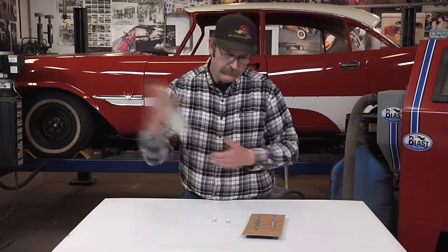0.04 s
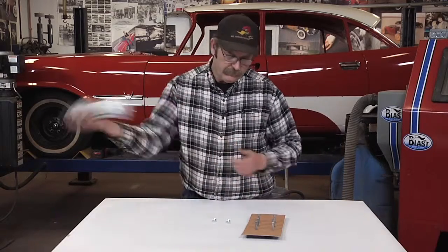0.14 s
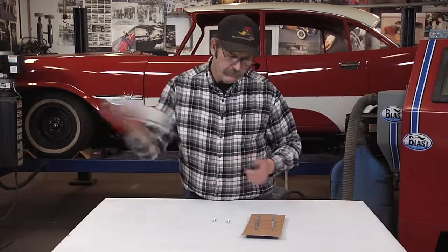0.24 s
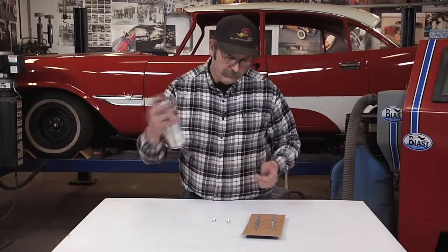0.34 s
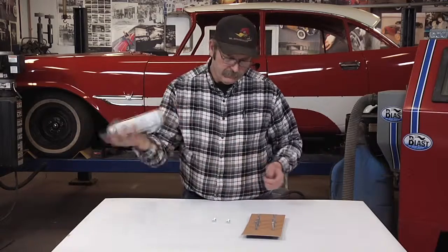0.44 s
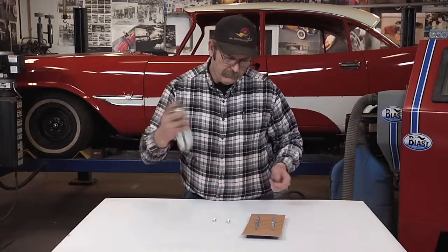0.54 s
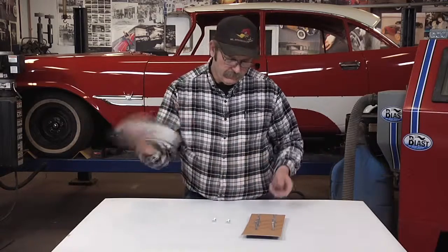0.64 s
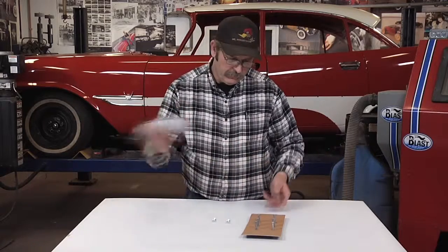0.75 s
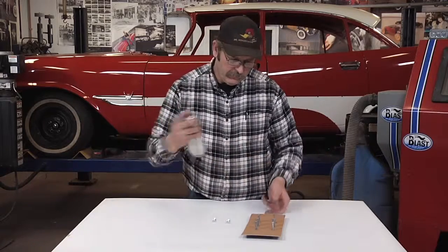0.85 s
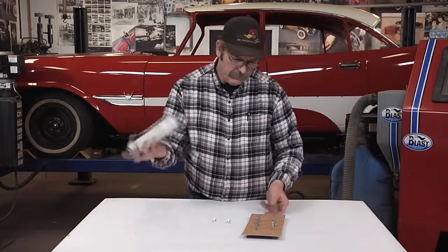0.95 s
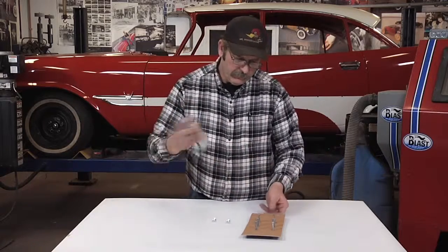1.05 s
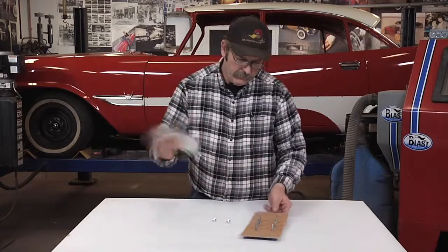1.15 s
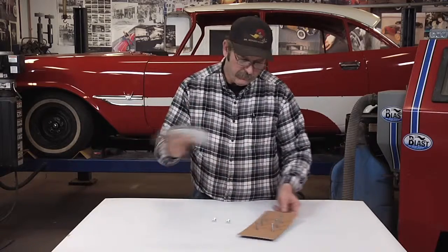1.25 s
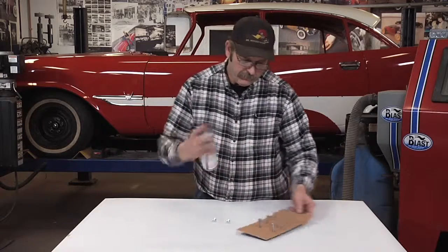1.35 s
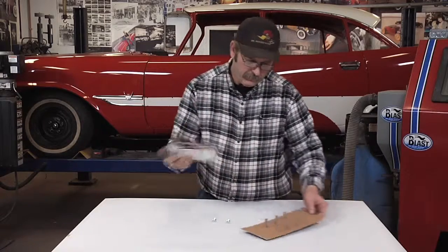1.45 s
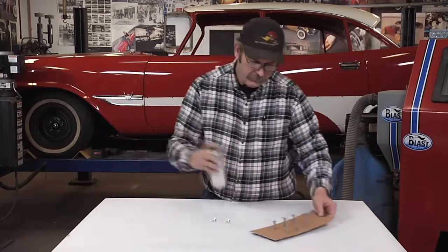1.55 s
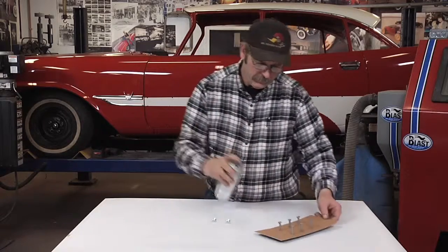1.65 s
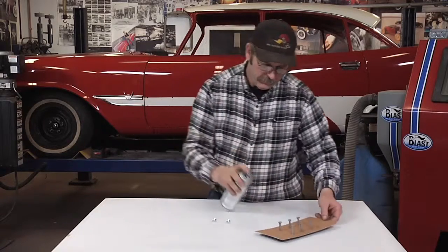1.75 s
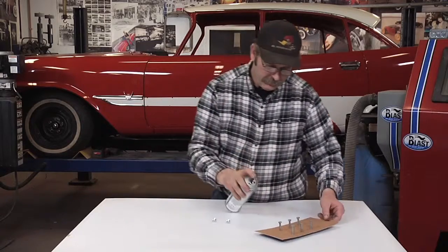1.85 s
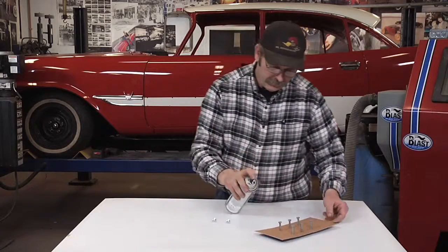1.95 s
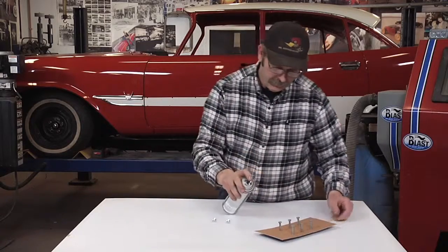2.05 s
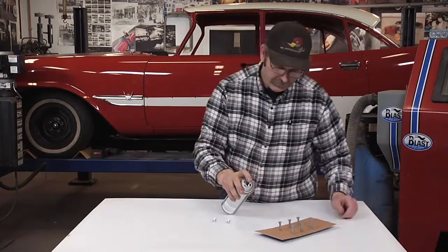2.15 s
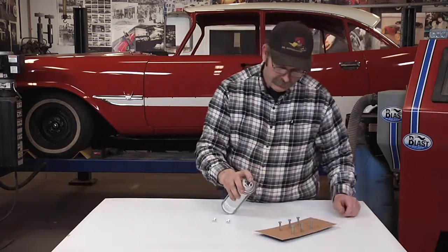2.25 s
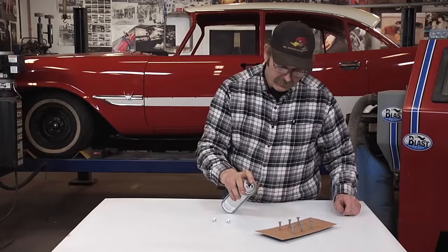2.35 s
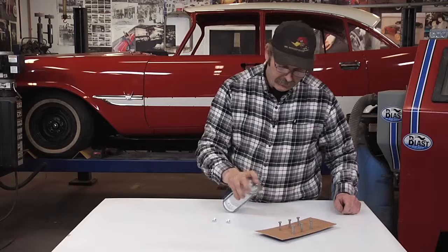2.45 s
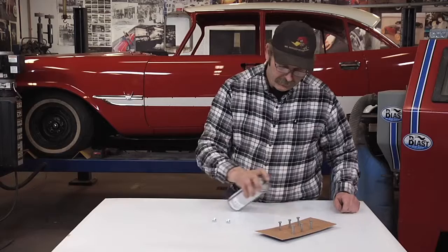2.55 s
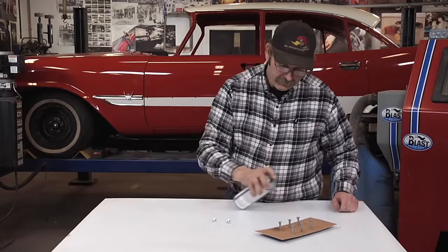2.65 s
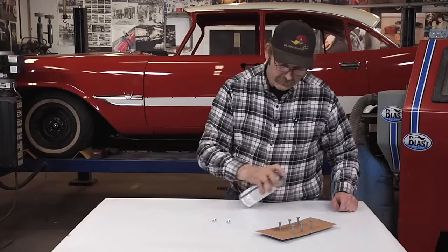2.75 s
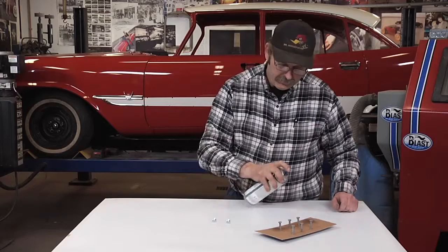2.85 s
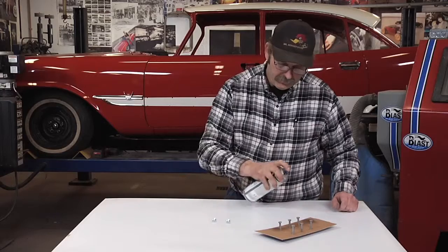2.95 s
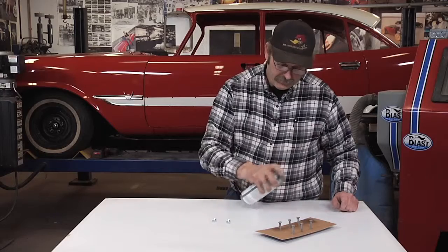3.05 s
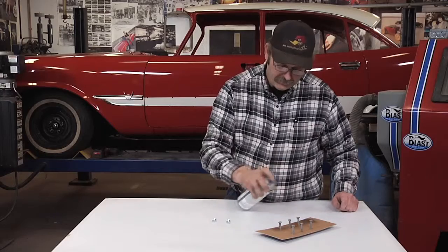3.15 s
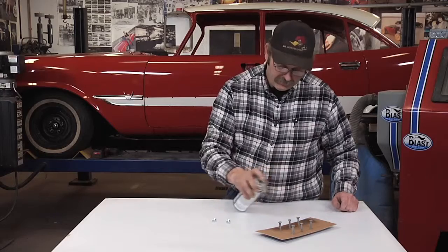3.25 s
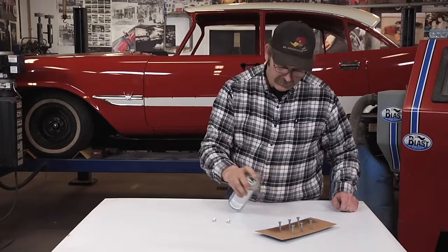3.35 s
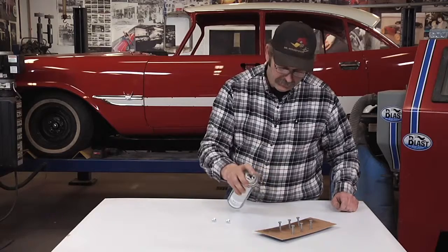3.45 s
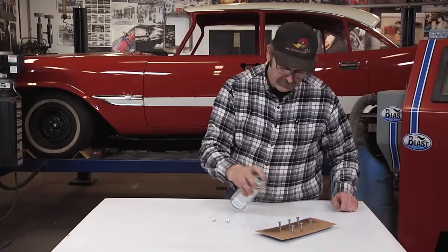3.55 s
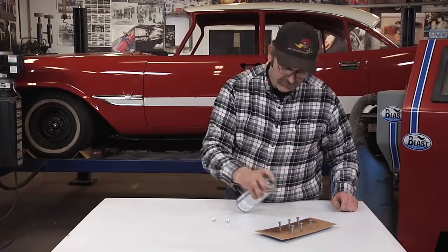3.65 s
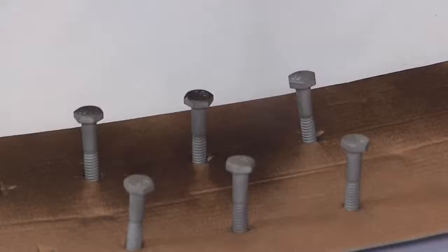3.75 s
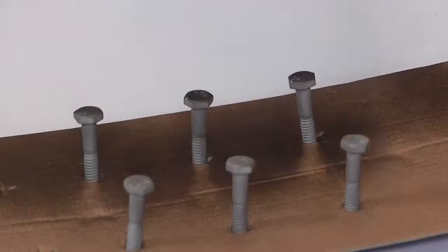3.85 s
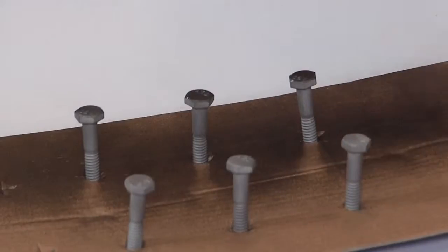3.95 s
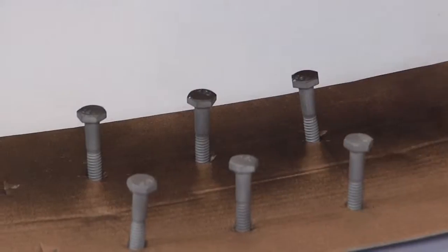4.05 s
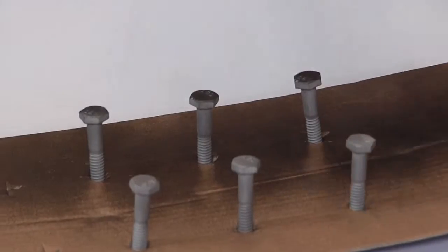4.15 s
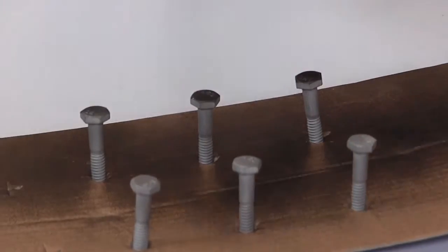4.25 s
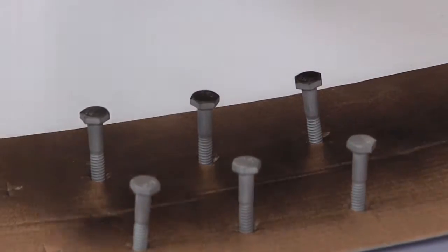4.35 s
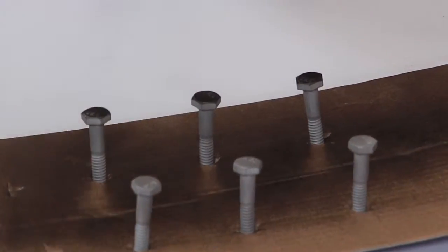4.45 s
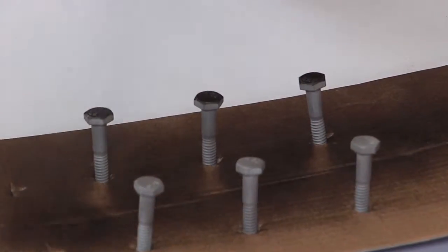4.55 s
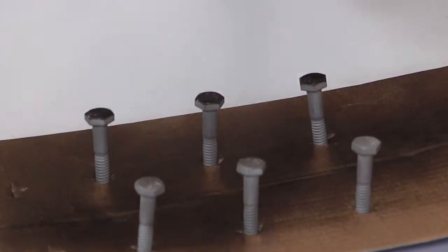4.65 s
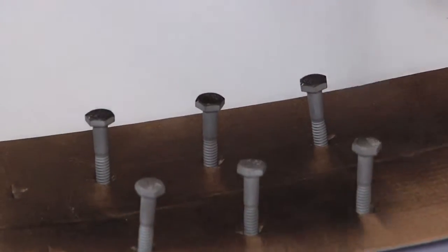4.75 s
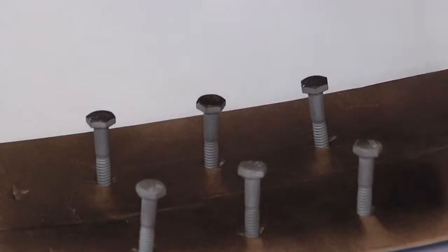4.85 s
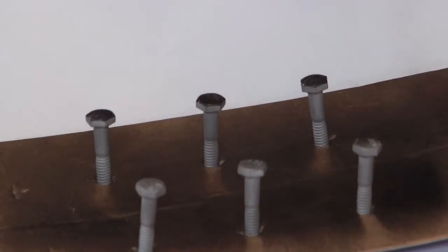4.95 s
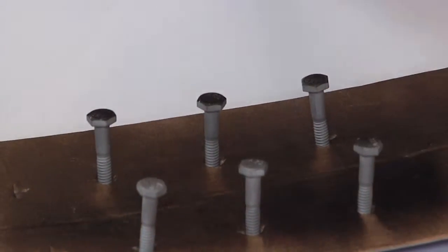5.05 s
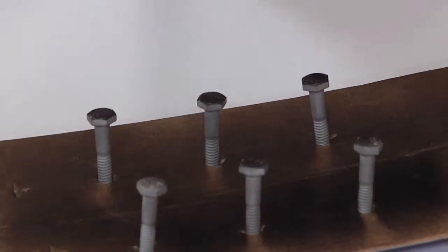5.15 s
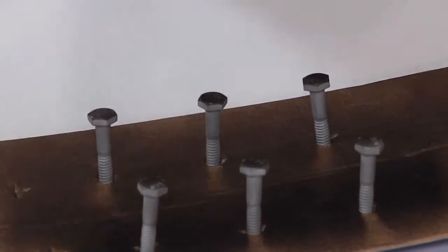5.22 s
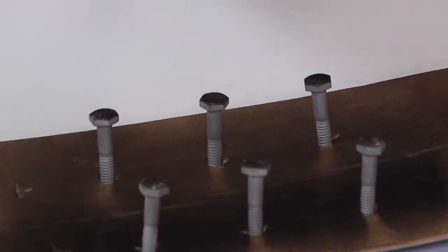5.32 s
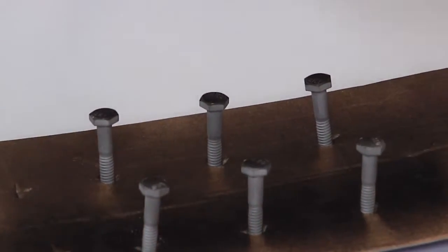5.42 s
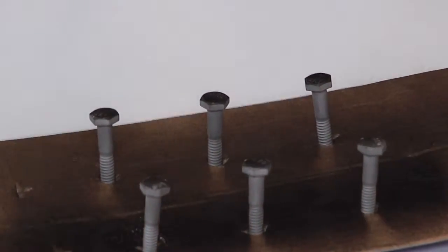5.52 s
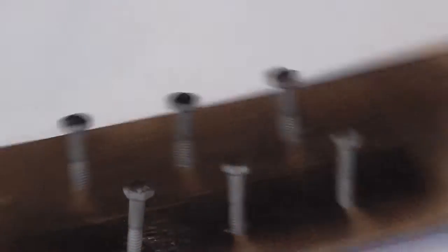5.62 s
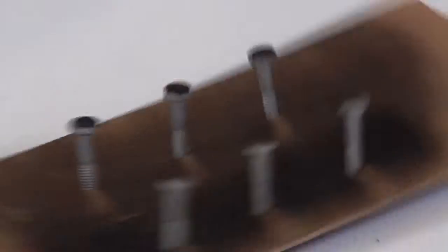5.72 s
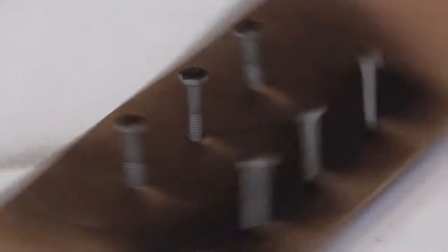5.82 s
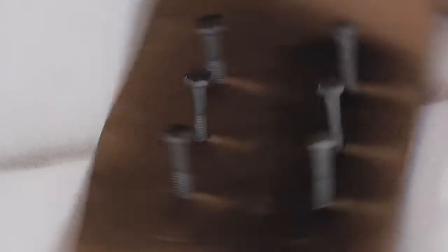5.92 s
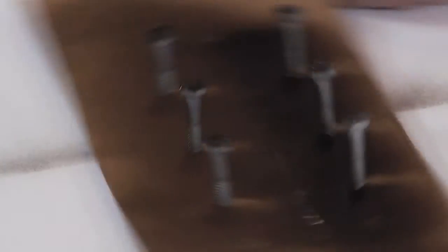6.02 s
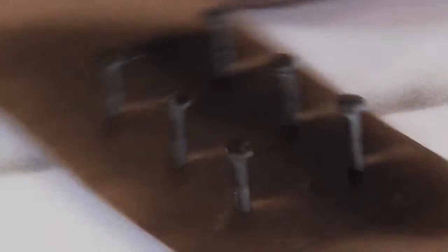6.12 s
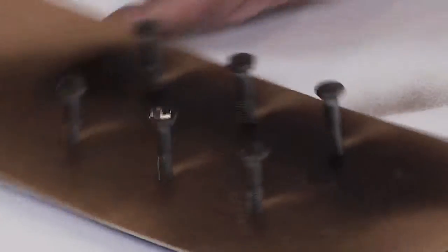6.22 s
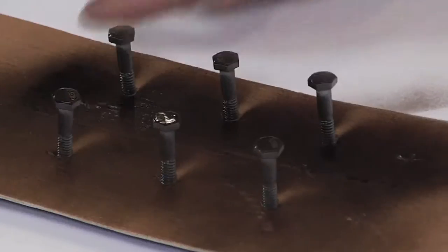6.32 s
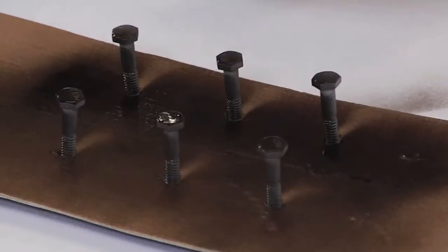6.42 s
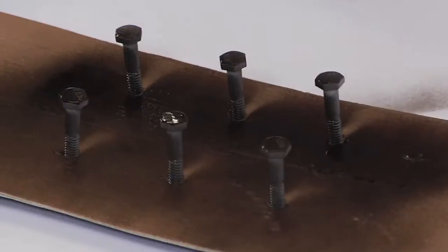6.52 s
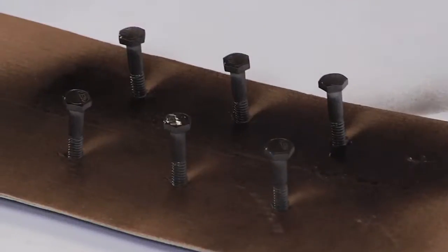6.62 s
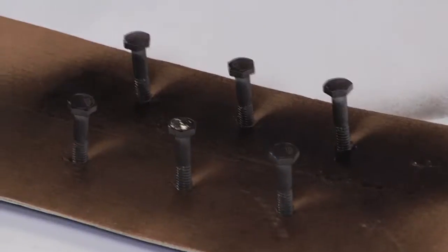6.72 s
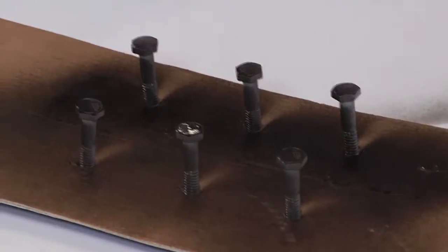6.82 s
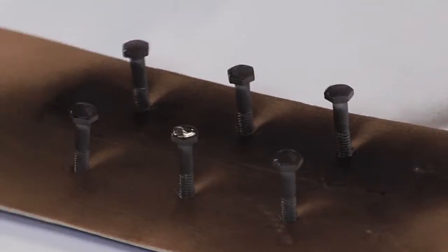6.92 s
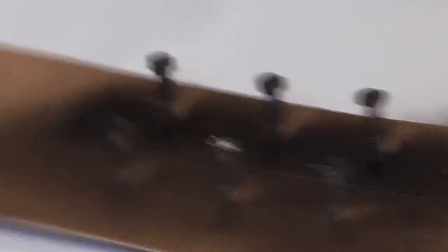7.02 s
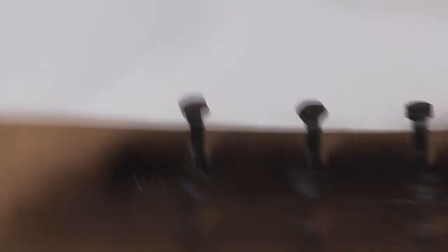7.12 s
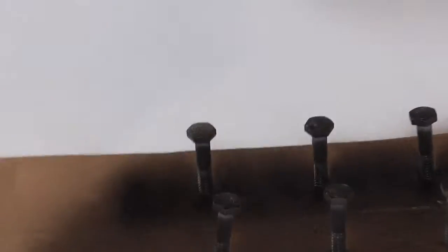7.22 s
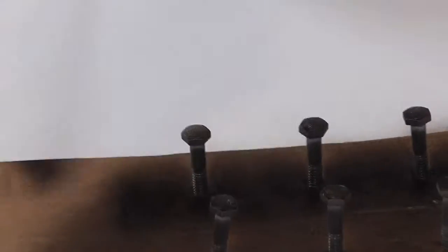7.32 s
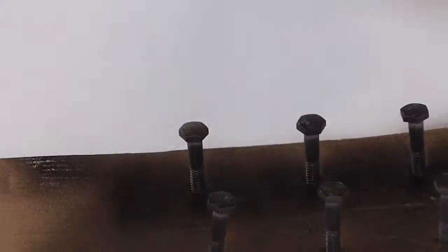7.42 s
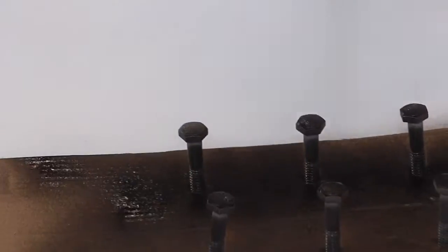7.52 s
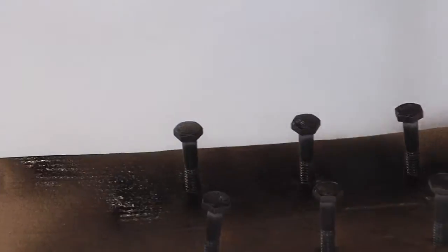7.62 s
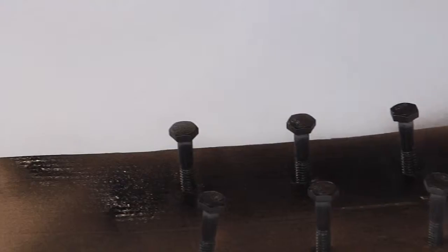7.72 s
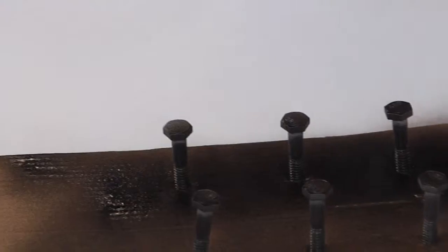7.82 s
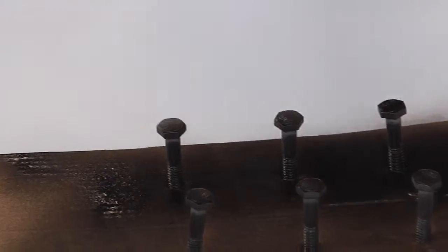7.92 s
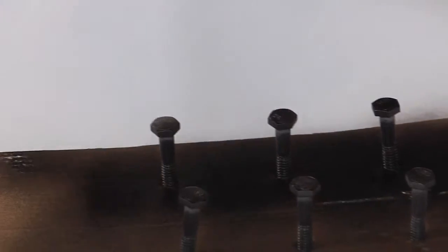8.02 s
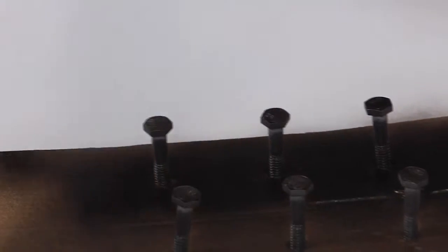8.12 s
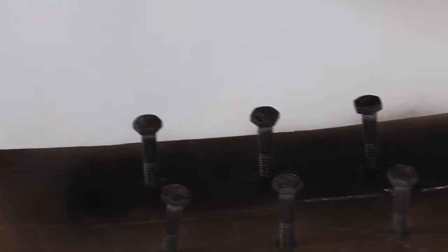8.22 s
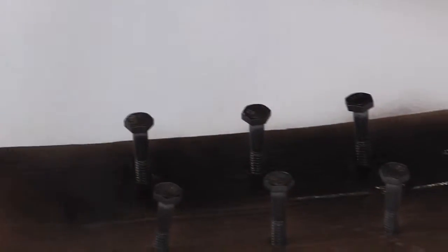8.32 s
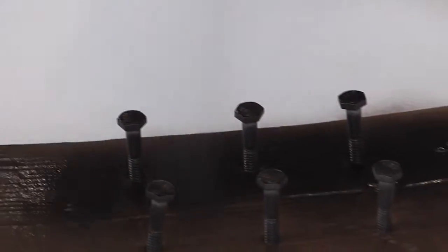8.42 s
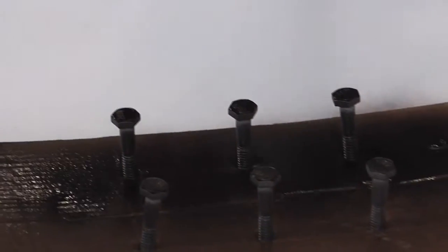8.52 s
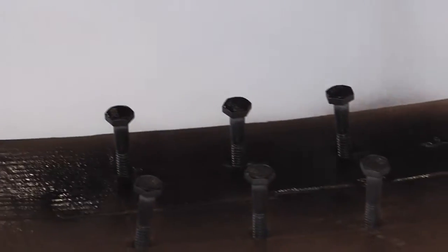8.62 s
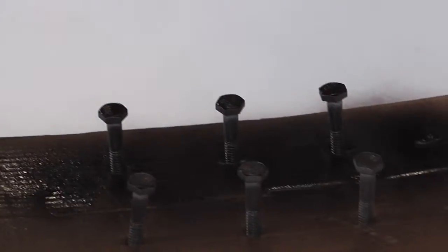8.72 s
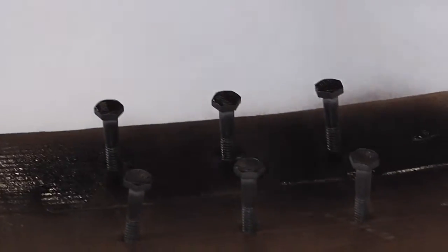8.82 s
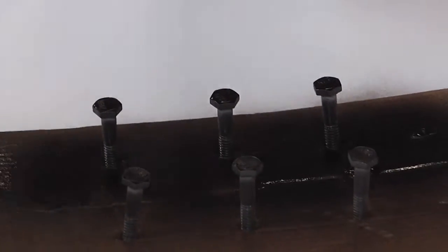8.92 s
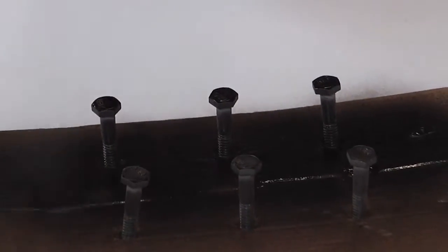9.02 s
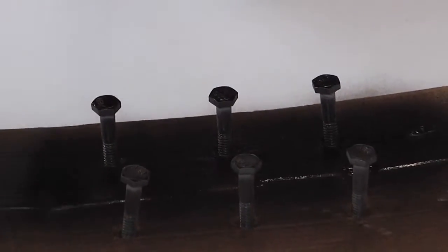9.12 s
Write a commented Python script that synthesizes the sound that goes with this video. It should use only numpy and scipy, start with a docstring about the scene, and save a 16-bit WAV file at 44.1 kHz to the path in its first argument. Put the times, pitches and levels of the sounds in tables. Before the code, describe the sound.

A spray can is shaken hard, its ball clacking loudly, then short hissing spurts come in two runs with cardboard scraped between them.

```python
"""In a workshop, a spray paint can is shaken close to a clip-on microphone; its ball clacks hard enough to overload it.
Each touch of the ball is a few damped modes, bursts of noise and a tick; a sleeve rustles as filtered noise.
Then ten short spurts of paint hiss over a table: noise combed by the table's echo as the can moves.
Between the two runs of spurts a sheet of cardboard is slid round on the table: resonant noise under grainy scuffing.
A few soft knocks on the table, short dull tones and noise, fall among the spurts and the sliding."""
import sys
import numpy as np
from scipy import signal
from scipy.fft import rfft, irfft
from scipy.io import wavfile
from scipy.ndimage import map_coordinates

SR = 44100
rng = np.random.default_rng(int(sys.argv[2]) if len(sys.argv) > 2 else 0)


def unload_audio(sound):
    """Save the sound as a 16-bit wav file, at the path given as the first command line argument."""
    columns = np.transpose(np.atleast_2d(sound))
    # keep every value between -1 and 1, then stretch to whole-number steps
    steps = np.round(np.clip(columns, -1, 1) * 32767)
    wavfile.write(sys.argv[1], SR, steps.astype(np.int16))


N = 404397
TIME_S = np.arange(N) / SR

# Steady background noise. Each row: frequency in Hz, relative level in dB per Hz.
FLOOR_SPECTRUM = [(25, -4.5), (60, -0.5), (120, -3), (200, -7.5), (500, -15.5), (1000, -23), (1700, -24.5),
                  (2500, -28.5), (6000, -31), (16000, -34.5)]
FLOOR_DB = -64.5
# The workshop's reverberation. Each row: frequency in Hz, t60 in seconds, level of the tail in dB.
ROOM = [(100, 0.43, -16), (400, 0.61, -11), (1200, 0.45, -9), (2500, 0.59, -9), (4970, 0.4, -8.5),
        (8850, 0.33, -10), (15000, .25, -8)]
# Sleeve rustles as the arm moves. Each row: start in seconds, length in seconds, relative level in dB.
SLEEVE_RUSTLES = [(0, 0.018, -55), (0.18, 0.16, -72), (0.442, 1.15, -59), (2.02, 0.66, -65.5)]
SLEEVE_RISE_S, SLEEVE_FALL_DB_PER_S = 0.012, 93
# Colour of dry scuffing. Each row: frequency in Hz, relative level in dB per Hz.
SCUFF_SPECTRUM = [(240, -35.5), (400, -10), (1250, -9.5), (1530, -2), (2290, -9.5), (2930, -10), (3470, -6),
                  (4240, -8), (10700, -8.5), (16000, -10.5)]
SHEET_RING_HZ = 10900

# The ball slams into the dome at the end of a stroke and bounces.
# Each row: time in seconds, strength in dB, dome ring in Hz, metal tick in dB (relative levels).
CLACKS = [(.3426, -11, 2684, -18.5), (0.3592, -17, 2624, -27.5), (0.4101, -21.5, 5056, -30.5),
          (.4206, -23, 4580, -40.5), (0.6222, -8.5, 4830, -17.5), (.6293, -17.5, 3060, -24.5),
          (0.633, -18.5, 3257, -21), (0.6655, -14, 4200, -20.5), (0.8552, -13.5, 4040, -20),
          (.8648, -13, 4360, -26.5), (.874, -18.5, 4479, -23.5), (1.1189, -7, 2623, -13),
          (1.1327, -13, 3330, -22.5), (1.1559, -14, 2400, -22.5), (1.1793, -19.5, 2810, -25.5),
          (1.3546, -13.5, 2830, -19.5), (1.3653, -9.5, 4150, -26), (1.3908, -17, 3900, -25),
          (1.399, -29, 4050, -34), (1.6126, -6, 4180, -19.5), (1.63, -16, 6600, -24),
          (1.6413, -23.5, 2530, -16)]
# The ball knocks against the side wall, or the base on the way back.
# Each row: time in seconds, strength in dB, wall ring in Hz, metal tick in dB (relative levels).
TOCKS = [(.2815, -33, 1760, -43.5), (.3163, -29.5, 1820, -37), (.3362, -30, 1830, -33),
         (.5276, -21, 1990, -28), (.5712, -22, 1940, -33), (.5938, -23.5, 1077, -35.5),
         (.618, -26, 1744, -35), (.672, -19.5, 1820, -25), (.692, -24, 910, -35), (.7383, -10, 1756, -20.5),
         (.7411, -15.5, 1500, -24), (.8006, -24, 1870, -42.5), (.8246, -22, 1020, -51.5),
         (.951, -18, 860, -32), (.9614, -19.5, 1430, -42.5), (.9717, -12, 1806, -19.5),
         (1.0087, -25, 1200, -38.5), (1.0472, -32, 2010, -49.5), (1.0886, -16.5, 980, -33),
         (1.1975, -22.5, 1570, -22), (1.2193, -21.5, 1830, -33.5), (1.2649, -16.5, 860, -25.5),
         (1.2747, -17, 2100, -26), (1.3221, -21.5, 780, -33.5), (1.3505, -30, 1830, -40),
         (1.4304, -19, 1060, -34.5), (1.441, -21, 830, -34), (1.4728, -12.5, 1700, -22),
         (1.5009, -19, 1420, -39), (1.5391, -18, 1440, -34), (1.5711, -25.5, 1260, -41),
         (1.5985, -28.5, 1200, -47), (1.6085, -31, 1300, -42), (1.658, -19, 1550, -40.5),
         (1.6702, -24.5, 1400, -41.5), (1.6822, -23.5, 940, -60), (1.8483, -22.5, 1600, -26),
         (1.8519, -20.5, 1300, -39), (1.925, -19.5, 1380, -70), (1.951, -19, 1500, -40),
         (1.99, -29.5, 1750, -36), (2.0082, -28.5, 1550, -55), (2.0702, -31, 1340, -49),
         (2.1105, -32.5, 1520, -55)]
# The ball rolls loosely as shaking starts and ends.
# Each row: start in seconds, length in seconds, strength in dB (relative).
ROLLS = [(0.293, .03, -34.5), (2.134, 0.11, -50.5)]
ROLL_GAP_S, ROLL_HZ, ROLL_SPREAD, ROLL_TICK_DB = 0.013, 1650, .15, -12
# a clack also shakes the wall; a tock also shakes the dome, the more the sharper its tick
CLACK_WALL_HZ, CLACK_WALL_DB = 1975, -6.5
TOCK_DOME_HZ, TOCK_DOME_OCTAVES, TOCK_DOME_TICK_SHARE = 3900, .45, .7
# Colour of the metal tick. Each row: frequency in Hz, relative level in dB per Hz.
TICK_SPECTRUM = [(100, 5), (500, 2), (1500, 4.5), (3000, 1.5), (6500, 1), (8500, 1), (12000, -0.5),
                 (16000, -12)]
# Crowd of weaker modes in the can's wall. Each row: frequency in Hz, relative level in dB per Hz.
WALL_SPECTRUM = [(60, -11.5), (200, -5.5), (500, 2.5), (1000, 4.5), (1900, 2.5), (2600, -22), (5000, -33)]
# Crowd of weaker modes in the can's dome. Each row: frequency in Hz, relative level in dB per Hz.
DOME_SPECTRUM = [(100, -14), (700, -21.5), (1600, -5.5), (2600, 0.5), (3500, -1), (4700, -2), (5800, -4.5),
                 (6500, -9.5), (8000, -15.5), (14000, -21)]
# Faint lasting ring of the steel shell. Each row: mode in Hz, relative level in dB.
STEEL_MODES = [(1805, 1), (1913, 4.5), (1991, 3.5), (2395, -2.5), (2477, -5), (2611, -1.5), (2763, 1),
               (3331, 1), (4031, 1.5), (5207, -2.5), (5368, -6), (6497, -6.5), (6593, -8.5)]
# Low jolt of the first stroke. Each row: frequency in Hz, relative level in dB per Hz.
JOLT_SPECTRUM = [(20, -4.5), (45, 0), (180, 0), (300, -14.5), (700, -41.5), (4000, -69)]
JOLT_S, JOLT_DB, JOLT_T60_S = .343, -28, 0.058

# Presses of the valve. Each row: start in seconds, length in seconds, flow in dB (relative),
# nozzle resonance in Hz, low rush against the flow in dB.
SPURTS = [(2.64, 0.33, -46.5, 9370, -8.5), (3.109, 0.42, -46, 9300, -11), (3.63, 0.43, -46, 9100, -11.5),
          (4.16, 0.38, -47, 8800, -11.5), (4.606, 0.37, -46, 8800, -11.5),
          (5.073, 0.36, -45.5, 9030, -13.5), (7.372, 0.475, -46.5, 9600, -9),
          (7.916, .397, -45.5, 9100, -10.5), (8.399, 0.39, -45.5, 8870, -11),
          (8.877, 0.28, -46, 8830, -11.5)]
VALVE_OPEN_S, VALVE_SHUT_DB_PER_S = 0.0084, 609
# The nozzle swoops over the table in each spurt, and the echo's lag with it.
# Each row: lag at the start in ms, lag at the end in ms, dip midway in ms.
SWOOPS = [(.534, .684, .018), (.696, .594, .108), (.582, .582, .054), (.582, .528, .048),
          (.516, .504, .012), (.516, .492, .036), (.475, .58, .03), (.624, .582, .048), (.594, .546, .024),
          (.558, .498, .006)]
# The treble is beamed at the table, the rush spreads to things farther off.
# Each row: multiple of the lag, treble share as a signed gain, rush share as a signed gain.
ECHOES = [(1, -.43, -.08), (1.19, .16, .05), (1.28, -.18, -.05), (2.2, .2, .17), (3.5, .15, .18)]
TREMOR_PER_S, TREMOR_DB = 10, 0.56  # the hand trembles, and the lags of the farther echoes waver
# The jet's high hiss. Each row: frequency in Hz, relative level in dB per Hz.
HISS_SPECTRUM = [(4000, -20), (6000, -12.5), (7200, -8.5), (9000, -2.5), (11300, -4.5), (13000, -2),
                 (15000, 1), (16000, -7)]
# The jet's lower rush. Each row: frequency in Hz, relative level in dB per Hz.
RUSH_SPECTRUM = [(290, -26), (500, -8), (822, -8.5), (1200, -0.5), (1310, -1.5), (1740, -1.5),
                 (2370, -11.5), (2650, -4.5), (3090, -7.5), (3410, -2), (4450, -3), (4920, -1.5),
                 (5550, -6), (6550, -2), (7000, -10.5), (9100, -38), (15400, -120)]

# Soft knocks on the table. Each row: time in seconds, relative level in dB, ring in Hz.
KNOCKS = [(3.847, -38.5, 466), (4.83, -55, 330), (6.609, -58, 380), (6.728, -55, 1350), (7.129, -44, 1024),
          (7.369, -38.5, 490), (7.611, -44.5, 440)]
# Modes of the table top. Each row: frequency in Hz, relative level in dB, t60 in seconds.
TABLE_MODES = [(250, -4.5, .17), (335, -7, .14), (442, -3.5, .3), (602, -7, .17)]
# Colour of the tap. Each row: frequency in Hz, relative level in dB per Hz.
TAP_SPECTRUM = [(80, -21), (250, 10.5), (600, 4), (1200, -12), (2000, -11), (6000, -16)]

# Pushes of the cardboard over the table. Each row: start in seconds, length in seconds, singing in dB,
# scuffing in dB (relative levels), rise of the pitch at full speed in Hz.
PUSHES = [(5.61, 0.079, -66, -67, 0), (5.679, 0.085, -56, -62.5, 0), (5.79, 0.12, -66, -60.5, 0),
          (5.85, .31, -59.5, -57, 750), (6.147, 0.23, -56, -68.5, 130), (6.227, .04, -62, -63, 0),
          (6.3, 0.046, -60, -65, 0), (6.88, 0.068, -65, -62.5, 0), (6.98, 0.043, -60.5, -71, -1.5),
          (7.091, 0.18, -59, -57.5, 0)]
PUSH_RISE_S, PUSH_FALL_DB_PER_S, PUSH_SPEED_DB, CARD_HZ = 0.027, 172, 1.2, 1550
# The cardboard's edge catches with a dry tick. Each row: time in seconds, level in dB.
CATCHES = [(6.245, -59), (6.317, -59), (6.463, -70), (6.888, -55)]
CATCH_T60_S = 0.05
CEILING, EDGE_HZ = 0.21, 15950  # overload level in full scale; upper band limit


def gain_of(db):
    """Amplitude factor of a level in dB."""
    return 10 ** (np.asarray(db) / 20)


def evened(x):
    """Scales to rms 1."""
    return x / np.sqrt(np.mean(x ** 2) + 1e-20)


def read(points, hz):
    """Joins (Hz, value) points on a log-frequency axis."""
    f, value = np.transpose(points)
    return np.interp(np.log(hz + 1), np.log(f + 1), value)


def add(mix, s, sound):
    """Adds a sound to the mix at s seconds."""
    part = mix[max(round(s * SR), 0):][:len(sound)]
    part += sound[:len(part)]


def noise(spectrum):
    """Steady Gaussian noise of the given colour, about rms 1."""
    length = 10 * SR
    gain = gain_of(read(spectrum, np.fft.rfftfreq(length, 1 / SR)))
    return evened(irfft(rfft(rng.standard_normal(length)) * gain))[:N]


def flutter(rate_hz, depth_db):
    """A random gain of rms 1 that wavers at about the given rate."""
    steps = rng.standard_normal(SR)
    return evened(gain_of(depth_db * np.interp(TIME_S * rate_hz, np.arange(SR), steps)))


def resonate(x, hz, width_hz):
    """A resonance of gain 1 that follows the curve hz: shift to 0 Hz, smooth, shift back."""
    turn = np.exp(2j * np.pi * np.cumsum(hz * np.ones(len(x))) / SR)
    r = np.exp(-np.pi * width_hz / SR)
    return 2 * (turn * signal.lfilter([1 - r], [1, -r], x / turn + 1e-18)).real


def resonant_noise(hz, width_hz):
    """White noise through two equal resonances in series, rms 1."""
    once = resonate(rng.standard_normal(N), hz, width_hz)
    return evened(resonate(once, hz, width_hz))


def ring(t, hz, t60_s, rise_s, phase_turns=0):
    """One damped mode that swells with the time constant rise_s."""
    wave = np.sin(2 * np.pi * (hz * t + phase_turns))
    return wave * gain_of(-60 * t / t60_s) * (1 - np.exp(-t / rise_s))


def burst(source, t, where, t60_s):
    """A dying snatch of noise: many close modes struck at once."""
    return source[int(where * (N - len(t))):][:len(t)] * gain_of(-60 * t / t60_s)


def gate(start_s, length_s, rise_s, fall_db_per_s):
    """An envelope that rises, holds until the length is over and then dies away."""
    t = TIME_S - start_s
    return np.clip(t / rise_s, 0, 1) * gain_of(-fall_db_per_s * np.clip(t - length_s, 0, 1))


def workshop(x, first_s=0.0079):
    """Dense reflections of random sign, each band dying at its own speed."""
    taps = rng.standard_normal(SR) * (rng.random(SR) < 5000 / SR) * (np.arange(SR) > first_s * SR)
    hz, t, z = signal.stft(taps / np.linalg.norm(taps), SR, nperseg=128)
    room = np.array(ROOM)
    t60_s = read(room[:, :2], hz)[:, None]
    level_db = read(room[:, ::2], hz)[:, None]
    even_energy = np.sqrt(2 * np.log(1000) / t60_s)  # long and short tails carry alike
    tail = signal.istft(z * gain_of(level_db - 60 * t / t60_s) * even_energy, SR, nperseg=128)[1]
    return signal.fftconvolve(x, tail)[:N]


def scuff(level, scuff_db=-1.0, scratch_db=1.0, ring_db=-14.5):
    """Dry rubbing: coloured noise and a thin high ring, made grainy by flutter and small scratches."""
    snags = (rng.random(N) < 45 / SR) * rng.uniform(.3, 1, N)  # about 45 per second
    scratches = signal.lfilter([1], [1, -np.exp(-1 / (.0015 * SR))], snags)
    grain = flutter(rate_hz=660, depth_db=1.0) + gain_of(scratch_db) * scratches
    thin = evened(resonate(rng.standard_normal(N), SHEET_RING_HZ, 300))
    rubbing = noise(SCUFF_SPECTRUM) + gain_of(ring_db) * thin
    return gain_of(scuff_db) * level * rubbing * evened(grain) * flutter(rate_hz=35, depth_db=.7)


def sleeve():
    """Cloth rubs as the arm moves: gated scuffing."""
    level = sum(gain_of(db) * gate(start, length, SLEEVE_RISE_S, SLEEVE_FALL_DB_PER_S)
                for start, length, db in SLEEVE_RUSTLES)
    return scuff(level) * flutter(rate_hz=130, depth_db=0.9)


def blows():
    """Every touch of the ball as (s, wall ring Hz, wall dB, dome ring Hz, dome dB, metal tick dB)."""
    out, tocks = [], list(TOCKS)
    for (s, db, dome_hz, tick_db), spot in zip(CLACKS, rng.uniform(-1, 1, len(CLACKS))):
        wall_hz = CLACK_WALL_HZ * (1 + ROLL_SPREAD * spot)
        out.append((s, wall_hz, db + CLACK_WALL_DB, dome_hz, db, tick_db))
    for (start, length, db), chance in zip(ROLLS, rng.uniform(-1, 1, size=(len(ROLLS), 20, 2))):
        for s, (late, spot) in zip(np.arange(start, start + length, ROLL_GAP_S), chance):
            wall_hz = ROLL_HZ * (1 + ROLL_SPREAD * spot)
            tocks.append((s + .5 * late * ROLL_GAP_S, db, wall_hz, db + ROLL_TICK_DB))
    for (s, db, wall_hz, tick_db), spot in zip(tocks, rng.uniform(-0.92, 1, size=100)):
        dome_hz = TOCK_DOME_HZ * 2 ** (TOCK_DOME_OCTAVES * spot)
        dome_db = db + TOCK_DOME_TICK_SHARE * (tick_db - db)
        out.append((s, wall_hz, db, dome_hz, dome_db, tick_db))
    return out


def rattle(wall_db=1.5, dome_db=-1.0, tick_db=4.0, crowd_db=-5.0, spread_db=-3.0, thud_db=-22.0,
           steel_db=-37.0, skitter_db=-11.5):
    """The ball strikes the paint-damped can. Gives the sound towards the microphone and that spread all round."""
    near, around, t = np.zeros(N), np.zeros(N), np.arange(SR // 5) / SR
    ticks, walls, domes = noise(TICK_SPECTRUM), noise(WALL_SPECTRUM), noise(DOME_SPECTRUM)
    steel = sum(gain_of(db) * ring(t, hz, .2, .001) for hz, db in STEEL_MODES)
    thud = ring(t, 36, 0.066, .0007) + .5 * ring(t, 94, 0.041, 0.00055)  # the whole can jolts
    swell = 1 - np.exp(-t / 0.00029)
    for (s, wall_hz, wall, dome_hz, dome, tick), chance in zip(blows(), rng.random(size=(120, 13))):
        # one mode of the wall and one of the dome face the microphone; the room hears all modes alike
        tones = gain_of(wall + wall_db) * ring(t, wall_hz, 0.012, 0.00048, chance[0])
        tones = tones + gain_of(dome + dome_db) * ring(t, dome_hz, 0.011, .0004, chance[1])
        crowd = gain_of(wall) * burst(walls, t, chance[2], 0.0093)
        crowd = crowd + gain_of(dome) * burst(domes, t, chance[3], 0.013)
        crack = burst(ticks, t, chance[4], 0.0083)
        add(near, s, tones + swell * (gain_of(crowd_db) * crowd + gain_of(tick + tick_db) * crack))
        add(near, s, gain_of(dome) * (gain_of(steel_db) * steel + gain_of(thud_db) * thud))
        add(around, s, 0.34 * tones + gain_of(spread_db) * crowd + gain_of(tick + tick_db - 6.0) * crack)
        # the ball skitters on in four smaller touches, louder after a harder blow
        for when, size in chance[5:].reshape(-1, 2):
            touch = ring(t, dome_hz * (0.56 + 0.9 * size), 0.0085, .0002) + .5 * crack
            later_s = 0.0082 + 0.023 * when ** 2
            add(near, s + later_s, gain_of(dome + skitter_db - 10 * when) * size * touch)
    return near, around


def jolt():
    """The low jolt of the first stroke: a dying burst of low noise."""
    out, t = np.zeros(N), np.arange(SR // 5) / SR
    add(out, JOLT_S, gain_of(JOLT_DB) * burst(noise(JOLT_SPECTRUM), t, rng.random(), JOLT_T60_S))
    return out


def spray(hiss_db=-2.0, nozzle_db=-8.5, rush_db=-.5, nozzle_width_hz=1500):
    """A turbulent jet: a low rush and a hiss with a nozzle resonance, combed by the table's echo."""
    flow, rush, lag = np.zeros(N), np.zeros(N), np.zeros(N)  # lag in samples
    nozzle_hz = np.full(N, float(SPURTS[0][3]))
    for (start, length, db, hz, low_db), (first_ms, last_ms, dip_ms) in zip(SPURTS, SWOOPS):
        valve = gain_of(db) * gate(start, length, VALVE_OPEN_S, VALVE_SHUT_DB_PER_S)
        flow = flow + valve
        rush = rush + valve * gain_of(low_db)
        way, begun = np.clip((TIME_S - start) / length, 0, 1), TIME_S >= start
        nozzle_hz = np.where(begun, hz, nozzle_hz)
        lag_ms = first_ms + (last_ms - first_ms) * way - 4 * dip_ms * way * (1 - way)
        lag = np.where(begun, lag_ms * SR / 1000, lag)
    # droplets make the jet sputter
    sputter = flutter(rate_hz=700, depth_db=0.98) * flutter(rate_hz=27, depth_db=1.2)
    nozzle = resonant_noise(nozzle_hz, nozzle_width_hz)
    beam = flow * sputter * (gain_of(hiss_db) * noise(HISS_SPECTRUM) + gain_of(nozzle_db) * nozzle)
    low = rush * sputter * gain_of(rush_db) * noise(RUSH_SPECTRUM)
    out = beam + low
    for far, treble_share, rush_share in ECHOES:
        delay = far * lag * flutter(rate_hz=TREMOR_PER_S, depth_db=TREMOR_DB * (far - 1))
        echoed = treble_share * beam + rush_share * low
        out = out + map_coordinates(echoed, [np.arange(N) - delay], order=3)
    return out


def knocks(tone_db=-1.7, table_db=-10.0, tap_db=-2.5):
    """A short dull tap that sets the table top ringing."""
    out, t, taps = np.zeros(N), np.arange(SR // 3) / SR, noise(TAP_SPECTRUM)
    top = sum(gain_of(db) * ring(t, hz, t60_s, .0017) for hz, db, t60_s in TABLE_MODES)
    for (s, db, hz), where in zip(KNOCKS, rng.random(len(KNOCKS))):
        tone = ring(t, hz, .025, .00036) + .75 * ring(t, 1080, .0075, .0001)
        tap = gain_of(tone_db) * tone + gain_of(tap_db) * burst(taps, t, where, .019)
        add(out, s, gain_of(db) * (tap + gain_of(table_db) * top))
    return out


def cardboard(slide_db=-5.5, width_hz=560, rest_db=-6.):
    """Stick and slip sings in a broad resonance that shifts with speed, under scuffing that grows with it."""
    rub, dry, hz = np.zeros(N), np.zeros(N), np.full(N, float(CARD_HZ))
    for start, length, sing_db, scrape_db, rise_hz in PUSHES:
        push = gate(start, length, PUSH_RISE_S, PUSH_FALL_DB_PER_S)
        speed = np.sin(np.pi * np.clip((TIME_S - start) / length, 0, 1))
        rub = np.maximum(rub, gain_of(sing_db) * push)
        hz = hz + rise_hz * speed
        dry = np.maximum(dry, gain_of(scrape_db + PUSH_SPEED_DB * (speed - 1)) * push)
    # the sheet turns: its outer edge moves fast, the part near the pivot keeps the resting pitch
    edge, pivot = resonant_noise(hz, width_hz), resonant_noise(CARD_HZ, width_hz)
    sheet = evened(edge + gain_of(rest_db) * pivot)
    return (gain_of(slide_db) * rub * sheet + scuff(dry)) * flutter(rate_hz=130, depth_db=0.9)


def catches():
    """The cardboard's edge catches: dying bursts of scuff noise."""
    out, t, dry = np.zeros(N), np.arange(SR // 5) / SR, noise(SCUFF_SPECTRUM)
    for (s, db), where in zip(CATCHES, rng.random(len(CATCHES))):
        add(out, s, gain_of(db) * burst(dry, t, where, CATCH_T60_S))
    return out


def scene():
    """Sums the sources, the room and the floor; three sets of reflections take turns as the can swings."""
    can, around = rattle()
    soft, taps = sleeve() + spray() + cardboard(), knocks()
    swing = [np.cos(2 * np.pi * (3.7 * TIME_S + k / 3)) * np.sqrt(2 / 3) for k in range(3)]
    room = sum(workshop(around * share) for share in swing)
    room = room + workshop(.5 * soft + 2 * taps)
    mono = can + jolt() + soft + taps + catches() + room + gain_of(FLOOR_DB) * noise(FLOOR_SPECTRUM)
    return mono[None].repeat(2, axis=0)


def record(dry):
    """One microphone on both channels: the loudest clacks flatten against its ceiling; then the band limit."""
    clipped = dry / (1 + (dry / CEILING) ** 8) ** (1 / 8)
    lowpass = signal.firwin(511, EDGE_HZ, window=("kaiser", 9), fs=SR)
    return signal.oaconvolve(clipped, lowpass[None], "same")


dry = scene()
out = record(dry)
unload_audio(out)
```